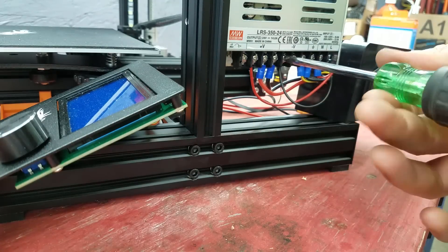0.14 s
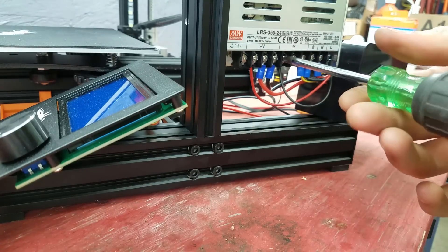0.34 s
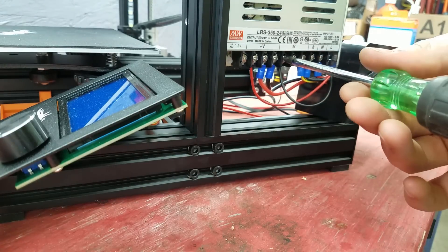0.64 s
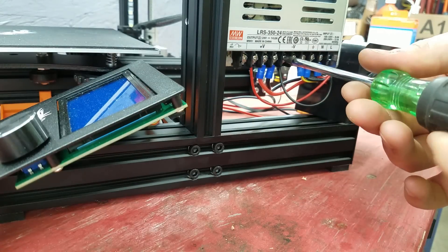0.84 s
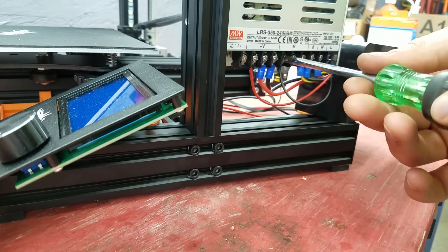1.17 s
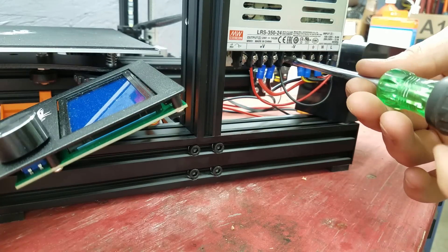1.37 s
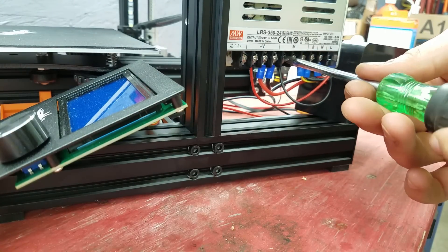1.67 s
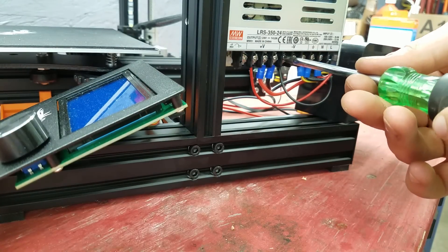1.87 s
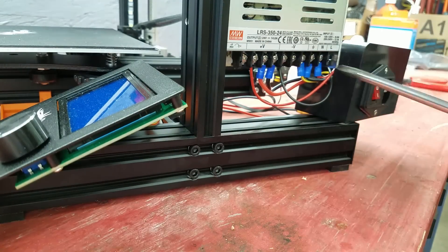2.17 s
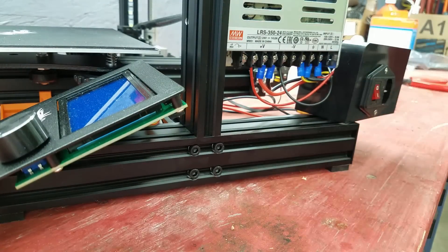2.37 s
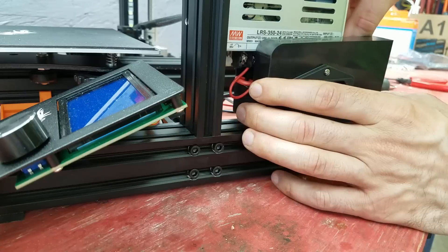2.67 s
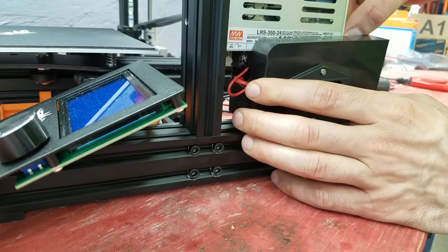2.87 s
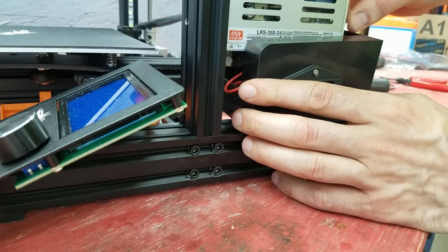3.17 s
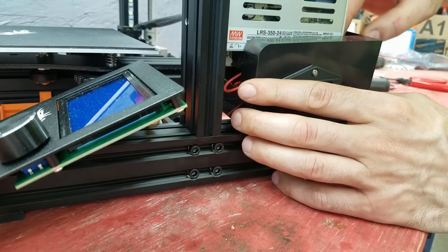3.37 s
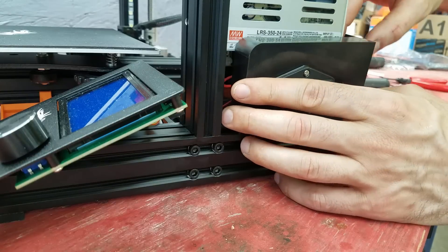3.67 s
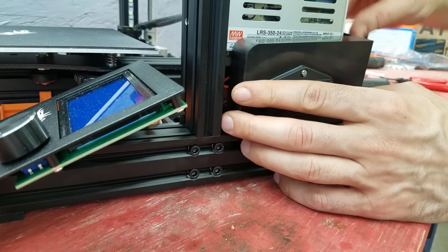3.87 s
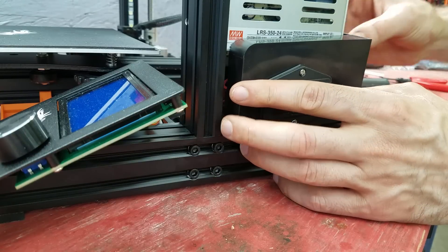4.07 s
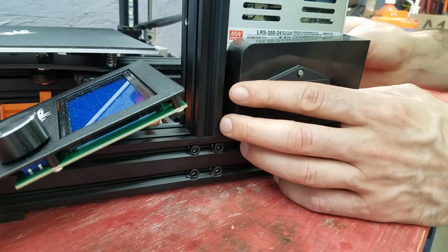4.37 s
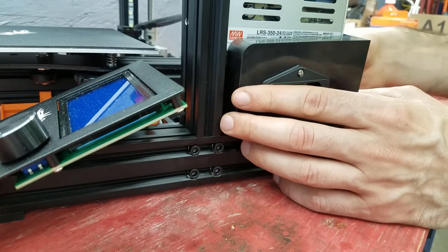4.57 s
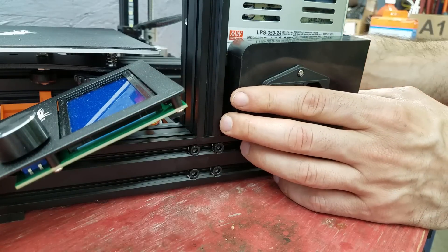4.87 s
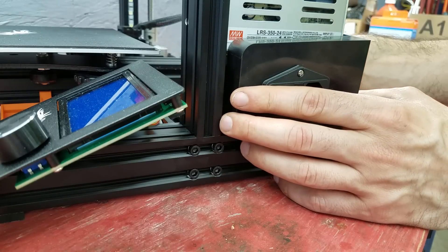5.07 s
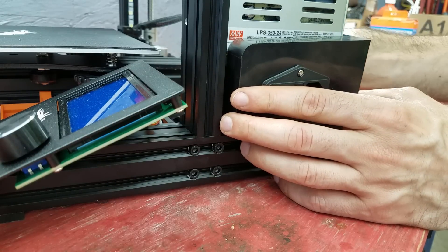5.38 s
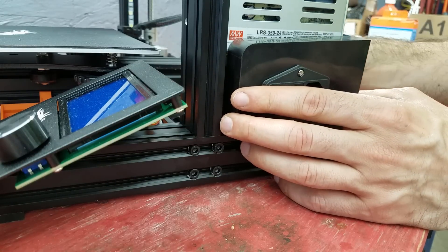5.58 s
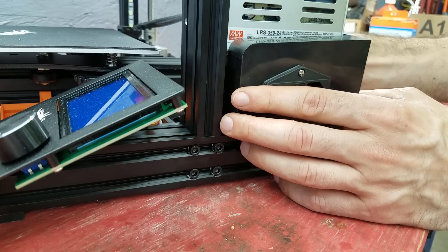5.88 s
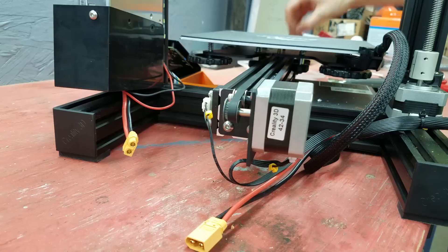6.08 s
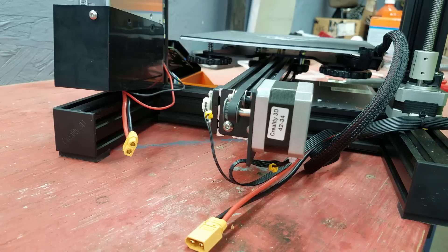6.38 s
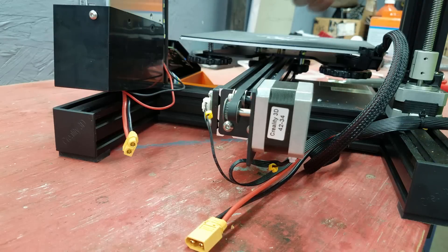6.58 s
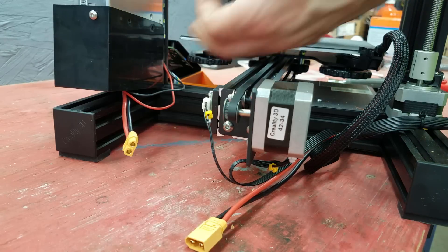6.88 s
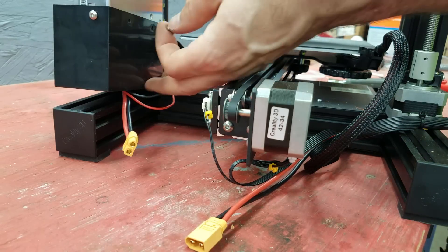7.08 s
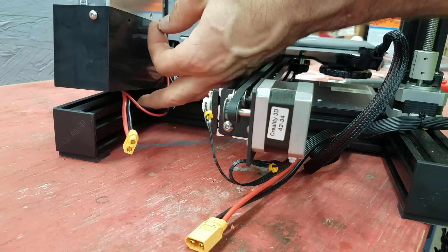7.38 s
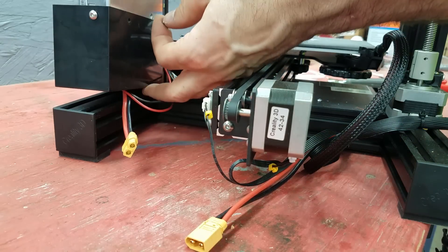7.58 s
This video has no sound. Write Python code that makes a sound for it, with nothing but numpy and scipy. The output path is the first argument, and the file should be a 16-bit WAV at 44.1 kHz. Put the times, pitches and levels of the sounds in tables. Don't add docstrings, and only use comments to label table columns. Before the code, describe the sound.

Sparse, quiet screwdriver clicks and slips open the scene over gentle microphone hiss. Hands then slide a plastic cover across a metal case with a short stuttering scrape and press it in with thick double snaps. Faint finger ticks and rubbing follow. A small steel piece lands brightly, bounces several times and rings thinly, then a knuckle raps the hollow cover loudest of all. Sleeves rustle, wires squeak barely, an insect chirps far away; the room echoes shortly.

```python
import sys
import numpy as np
from scipy import signal
from scipy.fft import rfft, irfft, next_fast_len
from scipy.io import wavfile
from scipy.ndimage import map_coordinates

SR = 44100
rng = np.random.default_rng(int(sys.argv[2]) if len(sys.argv) > 2 else 0)


def linear_from_db(decibels):
    return 10 ** (np.asarray(decibels, float) / 20)


def output_pcm(signal):
    pcm = np.clip(np.atleast_2d(signal).T, -1, 1) * 32767
    wavfile.write(sys.argv[1], SR, np.round(pcm).astype(np.int16))


N = 340893

# start in seconds, peak in dB, main ring in Hz, bright crack in dB.
TIP_CLICKS = [(.3205, -33.5, 746, -52.5), (.337, -47.5, 790, -40), (.543, -47, 900, -36),
              (.9405, -32, 790, -42), (1.056, -55, 950, -30), (1.075, -54, 920, -30)]
# start in seconds, peak in dB, main ring in Hz, bright crack in dB.
BLADE_SLIPS = [(.1095, -47, 3650, -8.5), (.11, -50, 1035, -12), (1.681, -44, 1100, -22),
               (1.696, -38, 1020, -20)]
# peak time in seconds, peak in dB, main ring in Hz, thud in dB, T60 in seconds.
DRIVER_TURNS = [(.552, -53, 920, 0.5, 0.099), (1.026, -59.5, 810, 1.5, 0.21), (1.688, -51, 990, -18, 0.15),
                (2.174, -56, 690, -14, 0.18)]
# centre in Hz, width in Hz, level in dB.
SHAFT_PEAKS = [(744, 86, 0), (950, 163, -2.5), (1430, 160, -4), (2130, 370, -5), (2640, 380, -4)]
# centre in Hz, width in Hz, level in dB.
SCREW_PEAKS = [(1980, 130, -2.5), (2700, 460, -10), (3650, 260, -7)]

# start in seconds, peak in dB, main ring in Hz, bright crack in dB.
COVER_KNOCKS = [(2.6625, -22, 1040, -12), (2.663, -22.5, 3300, -8.5), (2.76, -35.5, 1182, -10.5),
                (3.142, -32, 1150, -20), (3.143, -31.5, 1818, -12.5), (3.431, -40.5, 1100, -33),
                (3.602, -38.5, 926, -17.5), (4.526, -31, 3100, -17.5), (4.527, -34, 1320, -13),
                (5.9, -37, 1080, -30.5)]
# start in seconds, peak in dB, main ring in Hz, bright crack in dB.
SEATING_SNAPS = [
    (3.5505, -23, 950, -26),
    (3.5525, -16.5, 1150, -27),
    (3.558, -22, 850, -33),
    (3.563, -28, 1150, -31),
    (3.7985, -37.5, 1220, -36),
    (3.802, -21, 1184, -27),
    (3.809, -32, 1263, -35),
]
# start in seconds, peak in dB, main ring in Hz.
FINGER_TICKS = [(2.973, -47.5, 902), (4.07, -56.5, 366), (4.165, -65, 460), (4.404, -46.5, 1280),
                (4.657, -50, 1540), (4.715, -51, 1400), (4.739, -51.5, 1630), (4.918, -47, 1270),
                (5.07, -47.5, 1580), (5.106, -43, 1450), (5.134, -62, 299), (5.34, -50, 1000),
                (5.364, -54, 309), (5.485, -45, 1070), (5.509, -57, 702), (5.665, -51.5, 463),
                (5.794, -53, 700), (5.863, -57, 400)]
# start in seconds, peak in dB.
LID_BLOWS = [
    (3.1405, -30.5),
    (3.551, -24.5),
    (3.568, -36.5),
]
# time in seconds, level in dB.
JUDDER_LEVEL = [(2.4915, -120), (2.493, -43), (2.515, -49), (2.535, -44.5), (2.565, -46), (2.58, -65),
                (2.6, -90)]
# time in seconds, level in dB.
SLIDE_LEVEL = [(2.492, -120), (2.493, -45), (2.575, -42.5), (2.595, -48), (2.633, -43), (2.655, -46),
               (2.7, -56), (2.8, -74)]
# time in seconds, level in dB.
RUB_LEVEL = [(2.8, -74.5), (3.49, -70), (3.64, -53.5), (3.73, -69), (4.34, -90), (4.56, -76.5),
             (5.2, -83.5), (5.78, -72.5), (6.0, -73)]
# peak time in seconds, peak in dB, main ring in Hz, thud in dB, T60 in seconds.
SKIN_SCUFFS = [(2.633, -41, 1810, -13, 0.082), (2.871, -54.5, 1080, -23, 0.48),
               (2.964, -50.5, 880, -14, 0.127), (3.119, -52, 1100, -16, 0.092),
               (3.131, -38.5, 1820, -13, 0.067), (3.134, -37, 1070, -4, 0.14),
               (3.174, -39.5, 1050, -8, 0.094), (3.186, -42, 900, -10, 0.088), (3.199, -42, 1040, -9, 0.11),
               (3.218, -46.5, 995, -7, .15), (3.547, -28, 1084, -31.5, 0.043), (3.622, -54, 920, 2, 0.205),
               (3.787, -53, 1120, -16, 0.09), (4.375, -47, 900, -17, .2), (4.395, -47, 1420, -17, 0.2),
               (4.519, -46, 1180, -8, 0.19), (4.719, -54, 1190, -13, 0.23), (5.048, -48, 900, -6, 0.3),
               (5.085, -50, 1400, -10, .2), (5.35, -52, 1100, -10, .2), (5.505, -53, 900, -3, 0.26),
               (5.637, -51.5, 1388, -18, 0.3), (5.731, -53.5, 900, -4, 0.053), (5.791, -54, 670, -7, 0.083)]
# peak time in seconds, peak in dB, main ring in Hz, thud in dB, T60 in seconds.
COVER_SHOVES = [(3.447, -48, 750, -9.5, 0.29), (3.556, -24.5, 515, -14, 0.1), (4.356, -42, 945, -13, 0.249),
                (6.483, -40, 630, -6.5, 0.093)]
# centre in Hz, width in Hz, level in dB.
CASE_PEAKS = [(460, 150, -9), (1847, 300, -10), (2450, 400, -17), (3100, 520, -11.5), (4200, 700, -22)]
# centre in Hz, width in Hz, level in dB.
SLIDING_PEAKS = [(318, 73, 0.5), (600, 200, -4), (1000, 140, -2), (1400, 80, -5), (1830, 120, -2),
                 (3300, 330, -9)]
# centre in Hz, width in Hz, level in dB.
SEATED_PEAKS = [(438, 49, 5), (918, 53.4, -2), (1070, 113, 0.5), (1530, 27.3, -5), (1740, 90, -10),
                (2840, 180, -22.5), (4540, 41.6, -31.5)]
# frequency in Hz, level in dB, T60 in seconds.
LID_MODES = [(266, -13, 0.098), (448.3, -1, 0.14), (900, -4.5, .06), (1150, -6, 0.045), (1400, -7.5, 0.049),
             (1860, -7.5, .05), (2480, -19, 0.034)]
# frequency in Hz, level in dB, T60 in seconds.
FRAME_MODES = [(80.4, -11.5, 0.082), (113.94, 2, 0.102), (169, 2.5, 0.13), (256.4, 3, 0.069)]

# start in seconds, peak in dB, main ring in Hz, bright crack in dB.
PICK_UPS = [
    (6.5675, -33, 1700, -36),
    (6.6, -20.5, 1630, -30),
]
# start in seconds, peak in dB, main ring in Hz, bright crack in dB.
DROP_HITS = [
    (6.7796, -11, 3470, -13),
    (6.822, -20, 1610, -8.5),
    (6.829, -27, 3300, -12),
    (6.851, -26, 1567, -12.5),
    (6.862, -24, 1680, -14.5),
    (6.87, -31.5, 3400, -11),
    (6.888, -34.5, 1900, -14.5),
]
# centre in Hz, width in Hz, level in dB.
TRAY_PEAKS = [(1600, 180, -3), (2500, 810, -6.5), (3680, 400, 0), (4700, 490, -10), (6200, 900, -9)]
# centre in Hz, width in Hz, level in dB.
PART_PEAKS = [(700, 250, -11), (1700, 290, -3), (2660, 900, -5), (3610, 530, -2.5), (4770, 480, -7.5),
              (6200, 660, -3), (9100, 1200, -13.5), (10900, 1200, -12)]
# frequency in Hz, level in dB, T60 in seconds.
STEEL_MODES = [(5760, -10, .15), (9367, -14, .3), (11320, -17, .24), (12880, -19, .26), (13935, 0, .4),
               (14510, -10, .2), (14720, -3, .25), (15200, -10, .15)]

# start in seconds, peak in dB.
KNUCKLE_KNOCKS = [
    (7.3545, -4),
]
# peak time in seconds, peak in dB, main ring in Hz, thud in dB, T60 in seconds.
HAND_GROPES = [
    (7.144, -35, 927, -2.5, 0.085),
    (7.286, -45.5, 715, -7, 0.16),
]
# frequency in Hz, level in dB, T60 in seconds.
BOX_MODES = [(397, -22, .12), (741, -12, 0.045), (1066, -10, .025), (1249, 0, .026), (1460, -14, .015),
             (1930, -5, .028), (2270, -8, .028), (2690, -15, .015), (3300, -11, .01), (6120, -22, .007)]
# frequency in Hz, level in dB, T60 in seconds.
HAND_BENCH_MODES = [(124, -4.5, .15), (199, 0, 0.13)]
# frequency in Hz, level in dB, T60 in seconds.
BENCH_MODES = [(124.4, 0.5, 0.19), (183, -7, .2), (263.8, -6.5, .16), (330.6, -17, 0.17)]
# frequency in Hz, T60 in seconds.
SHOP_T60_S = [(150, 0.65), (1000, 0.65), (2700, 0.67), (6000, 0.66), (12000, 0.4)]

# fastest moment in seconds, level in dB, seconds to fall by 10 dB.
SLEEVE_MOVES = [(2.07, -72.5, 0.01), (2.17, -64, 0.07), (2.38, -70, 0.29), (2.64, -57, 0.12),
                (3.13, -67.5, 0.14), (3.57, -67, 0.16), (4.38, -81, 0.36), (4.63, -74.5, 0.1851),
                (5.06, -76, 0.08), (5.33, -69.5, 0.08), (5.65, -78.5, 0.1), (6.09, -65.5, 0.28),
                (6.75, -73, 0.0646), (7.12, -75, 0.44), (7.55, -68, 0.25)]
# fastest moment in seconds, level in dB, seconds to fall by 10 dB.
WEIGHT_SHIFTS = [(.47, -72.5, .3), (1.03, -72.5, 0.13), (1.9, -74, .6), (2.65, -59, 0.13),
                 (3.65, -69.5, 0.402), (4.61, -78.5, 0.256), (5.68, -73, 0.334), (6.3, -80, 0.57),
                 (6.69, -63, 0.13), (7.22, -59.5, 0.16), (7.45, -57, 0.11)]
# centre time in seconds, length in seconds, pitch in Hz, level in dB.
WIRE_SQUEAKS = [(2.36, .28, 4250, -75), (2.3, .2, 8200, -84), (4.27, .1, 7900, -81), (4.72, .06, 8000, -81),
                (4.88, .08, 8400, -80), (5.33, .12, 6500, -78), (5.36, .2, 8300, -79)]
# first call in seconds, count of calls, pitch in Hz, first and second note in dB.
INSECT_CALLS = [(.44, 4, 11400, -80, -79), (2.43, 7, 11600, -78, -78), (6.27, 3, 11800, -77, -77)]
# frequency in Hz, density in dB per Hz.
HISS_SPECTRUM = [(15, -21), (30, -3), (60, -0.5), (120, -2.5), (300, 0), (1000, -6.5), (2500, -10),
                 (5000, -19.5), (8000, -23), (10300, -25), (11500, -17.5), (15700, -12.5), (16000, -56.5)]
# frequency in Hz, density in dB per Hz.
CLOTH_SPECTRUM = [(200, -28), (600, 5.5), (1500, 1.5), (4000, 0), (8000, -6), (10500, -12), (12500, -1.5),
                  (15700, -2.5), (16000, -52)]
# frequency in Hz, density in dB per Hz.
RUMBLE_SPECTRUM = [(20, -19), (45, -13), (75, 3), (130, -2.5), (250, -3.5), (500, -39)]
# frequency in Hz, likeness from 0 to 1.
HISS_ALIKE = [(60, 0.6), (130, 0), (400, 0.28), (1400, 0)]


def unit(x):
    return x / np.sqrt(np.mean(x ** 2) + 1e-20)


def peak(x):
    return x / np.abs(x).max()


def along(points, hz):
    f, v = np.transpose(points)
    return np.interp(np.log(hz + 1), np.log(f + 1), v)


def curve(rows):
    s, db = np.transpose(rows)
    return linear_from_db(np.interp(np.arange(N) / SR, s, db, left=-200, right=-200))


def wobble(rate_hz):
    knots = rng.standard_normal(int(N * rate_hz / SR) + 4)
    return map_coordinates(knots, [np.arange(N) * rate_hz / SR])


def filtered(x, response):
    n = x.shape[-1]
    m = next_fast_len(n + 4096)
    return irfft(rfft(x, m) * response(np.fft.rfftfreq(m, 1 / SR)), m)[..., :n]


def body(peaks):
    def response(f):
        total = 0
        for k, (hz, width_hz, db) in enumerate(peaks):
            damping = 1j * f * width_hz
            total = total + (-1) ** k * linear_from_db(db) * damping / (hz * hz - f * f + damping)
        return total
    return response


def pair(n, alike):
    shared, left, right = rng.standard_normal((3, n))
    alike = np.clip(alike, 0, 1)
    return np.sqrt(alike) * shared + np.sqrt(1 - alike) * np.array([left, right])


def ringing(modes, t, attack_s):
    ring = 0
    for hz, db, t60_s in modes:
        ring = ring + linear_from_db(db + rng.standard_normal() - 60 * t / t60_s) * np.sin(2 * np.pi * hz * t)
    return ring * (1 - np.exp(-t / attack_s))


def shop(x):
    length_s = .7 if np.abs(x).max() > linear_from_db(-32) else .3
    hz, t, z = signal.stft(rng.standard_normal((2, int(length_s * SR))), SR, nperseg=256)
    decay = linear_from_db(-60 * t / along(SHOP_T60_S, hz)[:, None])
    tail = signal.istft(z * decay, SR, nperseg=256)[1]
    tail = tail * (1 - np.exp(-np.arange(tail.shape[1]) / SR / 0.0028))
    return signal.fftconvolve(x, tail / np.linalg.norm(tail[0]), axes=1)


def add(out, s, near, thud, room_db, afar=None):
    answer = linear_from_db(room_db) * shop(near if afar is None else afar)
    for sound in near, thud, answer:
        out[:, round(s * SR):][:, :sound.shape[-1]] += sound


def placed(x, lag_samples, pan_db):
    side = np.array([[.5], [-.5]])
    return linear_from_db(side * pan_db) * filtered(x, lambda hz: np.exp(-2j * np.pi * hz * side * lag_samples / SR))


def contacts(events, peaks, under, body_db, broad_db, q, rise_s, firm, hard_hz, room_db, thud_db, t60_s,
             longer_low, order=1):
    out = np.zeros((2, N + 2 * SR))
    long = np.arange(SR // 3) / SR
    t = long[:SR // 8]
    thud_growth = 0.63
    bright = body([(4965, 7600, 0.89), (15070, 1700, 1.8)])
    rest = body(peaks)
    for s, db, hz, crack_db in events:
        decay_s = np.clip(t60_s * (1000 / hz) ** longer_low, .003, .2)
        shape = linear_from_db(-60 * t / decay_s) * (1 - np.exp(-t / rise_s))
        ring = body([(hz, hz / q, 0)])
        broad = body([(hz, 2 * hz, broad_db)])
        push = firm * (t == 0) + pair(len(t), 0.84) * shape
        own_push = push / 2 + pair(len(t), 0.68) * shape
        own = filtered(own_push, lambda f: ring(f) ** order + broad(f))
        knock = linear_from_db(body_db) * filtered(push, rest) + own
        knock = filtered(knock, lambda f: 1 / (1 + 1j * f / hard_hz) ** 2)
        crack = filtered(shape ** 1.32 * pair(len(t), 1 / 2), bright)
        near = peak(knock) + linear_from_db(crack_db + 8.0) * peak(crack)
        thud = linear_from_db(thud_db + thud_growth * db) * ringing(under, long, 0.017)
        add(out, s, linear_from_db(db) * near, thud, room_db)
    return out[:, :N]


def scuffs(events, peaks, under, rise_s):
    out = np.zeros((2, N + 2 * SR))
    t = np.arange(SR // 3) / SR
    low = body([(hz, np.log(1000) / np.pi / decay_s, db) for hz, db, decay_s in under])
    for s, db, hz, thud_db, t60_s in events:
        shape = np.clip(t / rise_s, 0, 1) ** 2 * linear_from_db(-60 * np.clip(t - rise_s, 0, 1) / t60_s)
        colour = body([(hz, hz / 6, 0), (0.89 * hz, 2 * hz, -10)])
        lumps = rng.standard_normal(len(t) // 128 + 1).repeat(128)[:len(t)]
        grit = shape * np.exp(lumps / 3)
        soft = lambda f: (colour(f) + linear_from_db(-11.0) * body(peaks)(f)) / (1 + 1j * f / 2500) ** 2 + linear_from_db(-42.5)
        near = filtered(grit * pair(len(t), 0.681), soft)
        thud = filtered(shape * pair(len(t), 1.0), low)
        add(out, s - rise_s, linear_from_db(db) * peak(near), linear_from_db(db + thud_db) * peak(thud), room_db=-17.5)
    return out[:, :N]


def struck(events, modes, under, crack_db, room_db, thud_db, thud_late_s, low_hz):
    out = np.zeros((2, N + 2 * SR))
    t = np.arange(SR // 3) / SR
    small = lambda f: (1j * f / (low_hz + 1j * f)) ** 2
    dull = lambda f: small(f) / (1 + 1j * f / 4500) ** 2
    for s, db in events:
        ring = np.array([ringing(modes, t, 0.00059), ringing(modes, t, 0.00061)])
        ring = peak(filtered(ring, small))
        crack = linear_from_db(crack_db) * peak(filtered(linear_from_db(-60 * t / .035) * pair(len(t), 0.69), dull))
        even = filtered(np.array([t == 0, t == 0]) * 1., dull)
        afar = ring + even * np.linalg.norm(crack) / np.linalg.norm(even)
        thud = np.pad(ringing(under, t, .008), (round(thud_late_s * SR), 0))
        add(out, s, linear_from_db(db) * (ring + crack), linear_from_db(db + thud_db) * thud, room_db, linear_from_db(db) * afar)
    return out[:, :N]


def judder():
    slip_hz = 685 * (1 + .025 * wobble(60))
    phase = 2 * np.pi * np.cumsum(slip_hz) / SR
    return curve(JUDDER_LEVEL) * linear_from_db(2.5 * wobble(120)) * (np.sin(phase) + linear_from_db(-13) * np.sin(2 * phase))


def scrape(rows, peaks):
    grit = linear_from_db(2.5 * wobble(300)) * pair(N, .85)
    wall = lambda f: 1 / (1 + 1.1j * f / 2200 - (f / 2200) ** 2) ** 2
    return curve(rows) * unit(filtered(grit, lambda f: body(peaks)(f) * wall(f)))


def cover():
    knocks = contacts(COVER_KNOCKS, CASE_PEAKS, FRAME_MODES, body_db=-3.0, broad_db=-10.0, q=10.17,
                      rise_s=0.00041, firm=9, hard_hz=2882, room_db=-18.0, thud_db=-33.5, t60_s=0.027,
                      longer_low=0)
    snaps = contacts(SEATING_SNAPS, CASE_PEAKS[1:], FRAME_MODES, body_db=-13.5, broad_db=-20, q=2.6,
                     rise_s=0.0008, firm=11.2, hard_hz=2200, room_db=-17, thud_db=-30.5, t60_s=.014,
                     longer_low=0, order=2)
    tick_crack_db = -17
    ticks = contacts([(*row, tick_crack_db) for row in FINGER_TICKS], CASE_PEAKS, FRAME_MODES, body_db=-2,
                     broad_db=-7.5, q=5, rise_s=0.00047, firm=6.2, hard_hz=3100, room_db=-15, thud_db=-35,
                     t60_s=.024, longer_low=0)
    blows = struck(LID_BLOWS, LID_MODES, FRAME_MODES, crack_db=-25, room_db=-16, thud_db=-27,
                   thud_late_s=0.0061, low_hz=150)
    slides = judder() + scrape(SLIDE_LEVEL, SLIDING_PEAKS) + scrape(RUB_LEVEL, SEATED_PEAKS)
    skin = scuffs(SKIN_SCUFFS, SEATED_PEAKS, FRAME_MODES, rise_s=0.02)
    shoves = scuffs(COVER_SHOVES, SEATED_PEAKS, FRAME_MODES, rise_s=.003)
    return knocks + snaps + ticks + blows + slides + skin + shoves


def screwdriver():
    clicks = contacts(TIP_CLICKS, SHAFT_PEAKS, BENCH_MODES, body_db=-3.0, broad_db=-17, q=3.5, rise_s=0.003,
                      firm=1.5, hard_hz=2100, room_db=-17, thud_db=-28, t60_s=0.025, longer_low=0.83, order=2)
    turns = scuffs(DRIVER_TURNS, SEATED_PEAKS, FRAME_MODES, rise_s=0.04)
    slips = contacts(BLADE_SLIPS, SCREW_PEAKS, BENCH_MODES, body_db=-5, broad_db=-16.5, q=5.5, rise_s=0.0012,
                     firm=4.7, hard_hz=4500, room_db=-17.5, thud_db=-40, t60_s=.03, longer_low=0, order=2)
    return clicks + turns + slips


def steel():
    out = np.zeros((2, N + SR))
    t = np.arange(SR // 2) / SR
    for s, db, *_ in DROP_HITS:
        bounce_db = -17 * (s > DROP_HITS[0][0])
        out[:, round(s * SR):][:, :len(t)] += linear_from_db(db - 28 + bounce_db) * ringing(STEEL_MODES, t, 0.0176)
    return out[:, :N]


def small_part():
    hits = contacts(DROP_HITS, PART_PEAKS, BENCH_MODES, body_db=0.5, broad_db=-9.0, q=5.3, rise_s=0.000094,
                    firm=5.2, hard_hz=11900, room_db=-10.5, thud_db=-25.0, t60_s=0.083, longer_low=0.77)
    picks = contacts(PICK_UPS, TRAY_PEAKS, BENCH_MODES, body_db=2.0, broad_db=-7.5, q=10, rise_s=0.00009,
                     firm=5, hard_hz=3280, room_db=-13.5, thud_db=-31.5, t60_s=0.0374, longer_low=0)
    return hits + steel() + picks


def knuckle():
    knock = struck(KNUCKLE_KNOCKS, BOX_MODES, BENCH_MODES, crack_db=-8, room_db=-14, thud_db=-19,
                   thud_late_s=0.0119, low_hz=700)
    return knock + scuffs(HAND_GROPES, SEATED_PEAKS, HAND_BENCH_MODES, rise_s=.016)


def swells(moves, still_db):
    t = np.arange(0, N + 64, 64) / SR
    rise_share = 0.76
    gain = linear_from_db(still_db)
    for s, db, fall_s in moves:
        gain = gain + linear_from_db(db - 10 * np.maximum(t - s, (s - t) / rise_share) / fall_s)
    return np.interp(np.arange(N) / SR, t, gain)


def rush(spectrum, alike):
    turn = lambda hz: np.arccos(np.clip(along(alike, hz), -1, 1)) / 2
    shaping = lambda hz: linear_from_db(along(spectrum, hz)) * [np.cos(turn(hz)), np.sin(turn(hz))]
    mid, side = filtered(rng.standard_normal((2, N)), shaping)
    return unit(np.array([mid + side, mid - side]))


def rasps(rows, width_hz):
    out = np.zeros((2, N))
    for s, length_s, hz, db in rows:
        t = np.arange(round(length_s * SR)) / SR
        rasp = filtered(rng.standard_normal((2, len(t))), lambda f: np.exp(-(f / width_hz) ** 2))
        tone = np.sin(2 * np.pi * hz * t * (1 + .008 * (t / length_s - 1)))
        start = max(0, round((s - length_s / 2) * SR))
        out[:, start:][:, :len(t)] += linear_from_db(db) * unit(rasp) * tone * np.hanning(len(t)) ** 0.26
    return out


def insect():
    call_every_s, note_gap_s, note_s, note_step_hz = .502, .14, 0.095, 110.3
    notes = []
    for first_s, count, hz, *levels_db in INSECT_CALLS:
        for k in range(round(count)):
            for n in range(2):
                s = first_s + k * call_every_s + n * note_gap_s
                notes.append((s, note_s, hz + n * note_step_hz, levels_db[n]))
    return rasps(notes, width_hz=45)


def background():
    hiss = linear_from_db(-68) * rush(HISS_SPECTRUM, HISS_ALIKE)
    rumble = linear_from_db(2.3 * wobble(24)) * rush(RUMBLE_SPECTRUM, [(60, 0.82), (300, .4)])
    rumble = swells(WEIGHT_SHIFTS, still_db=-79.5) * rumble
    sleeve = linear_from_db(2.1 * wobble(57)) * rush(CLOTH_SPECTRUM, [(500, 0.2), (5000, 0.073)])
    sleeve = swells(SLEEVE_MOVES, still_db=-89) * sleeve
    return hiss + rumble + sleeve + insect() + rasps(WIRE_SQUEAKS, width_hz=193)


def scene():
    near = placed(cover(), lag_samples=2.0, pan_db=0.3)
    near = near + placed(screwdriver(), lag_samples=2.5, pan_db=-1.0)
    near = near + placed(small_part(), lag_samples=6, pan_db=-2)
    near = near + placed(knuckle(), lag_samples=-10, pan_db=1.8)
    return near + background()


def band_limit(x):
    return signal.sosfilt(signal.butter(12, 17000, fs=SR, output="sos"), x)


def record(dry):
    heard = filtered(dry, lambda hz: .08 + .92 / (1 + (hz / 15950) ** 120))
    heard = heard / (1 + np.abs(heard / .68) ** 4) ** (1 / 4)
    return band_limit(heard - .0004)


dry = scene()
out = record(dry)
output_pcm(out)
```